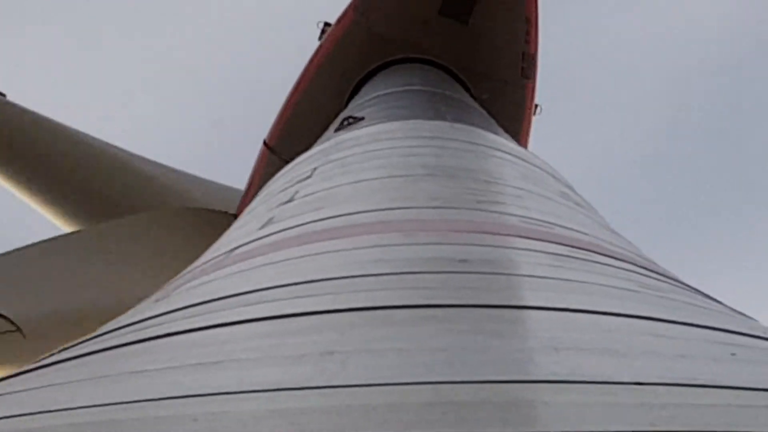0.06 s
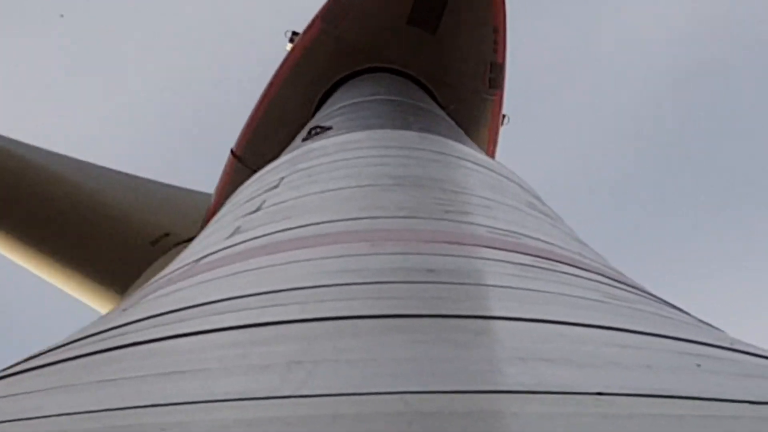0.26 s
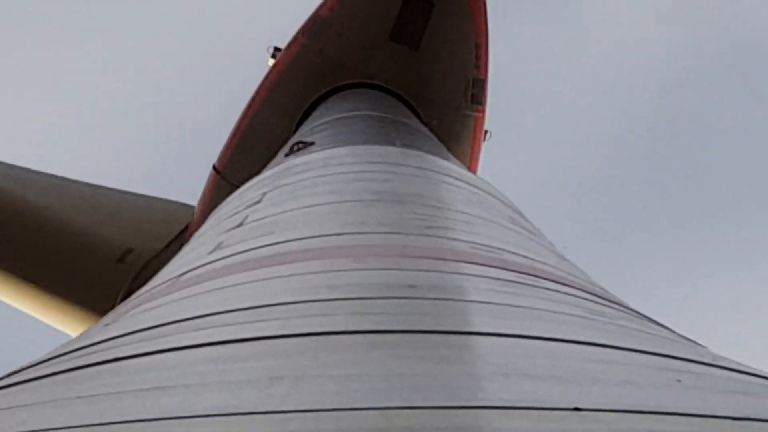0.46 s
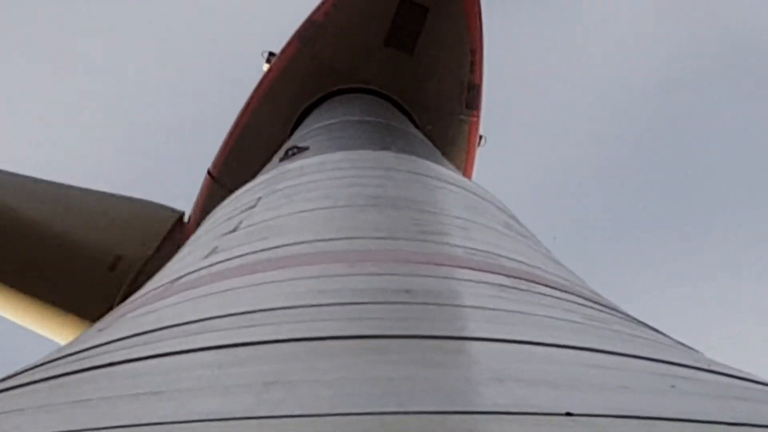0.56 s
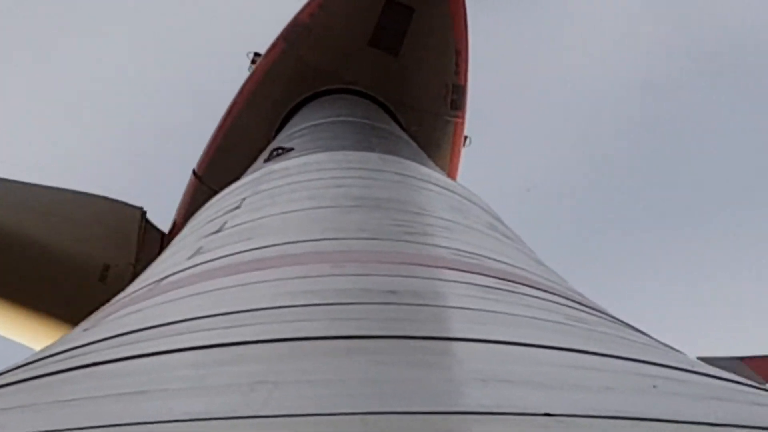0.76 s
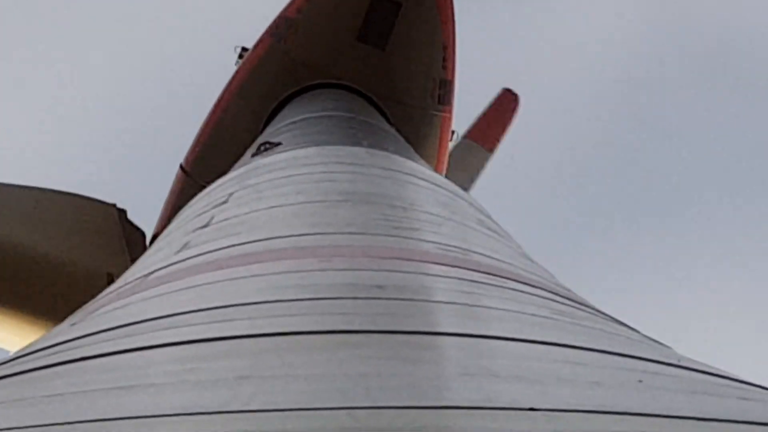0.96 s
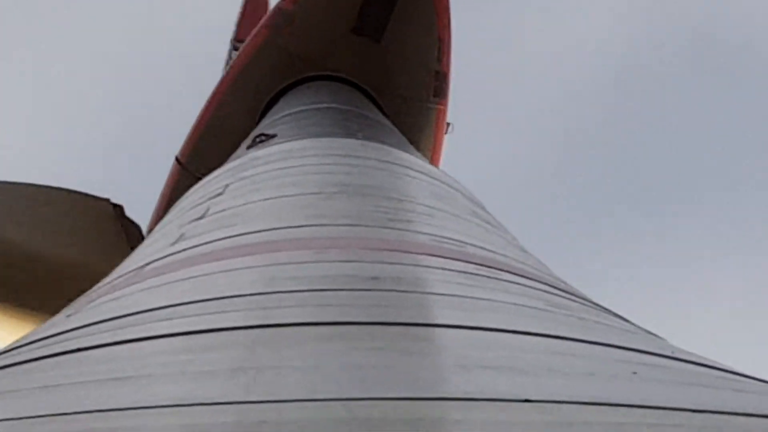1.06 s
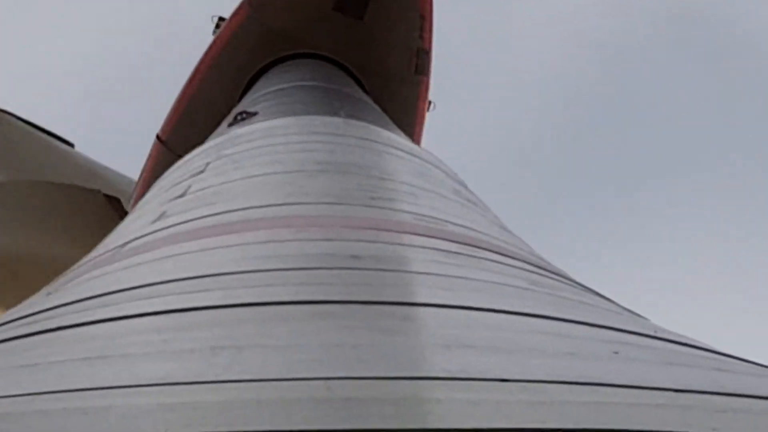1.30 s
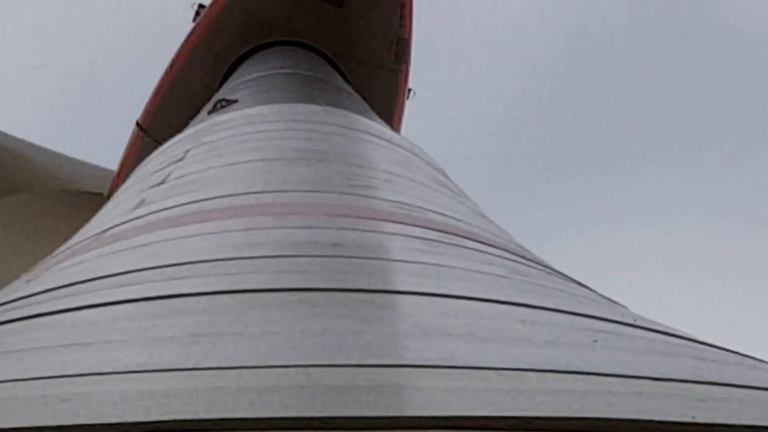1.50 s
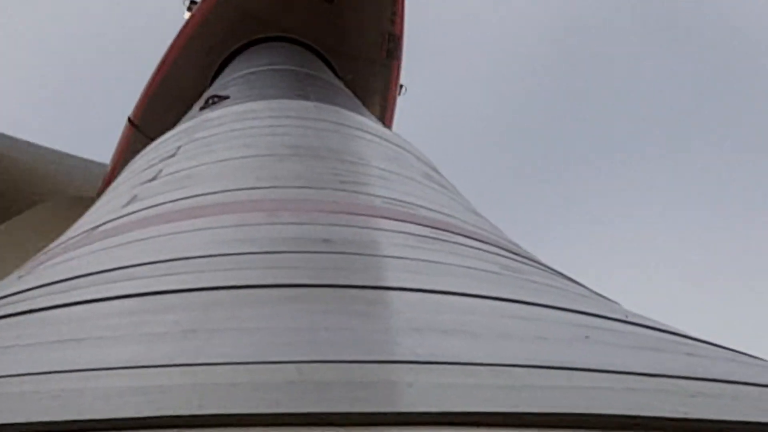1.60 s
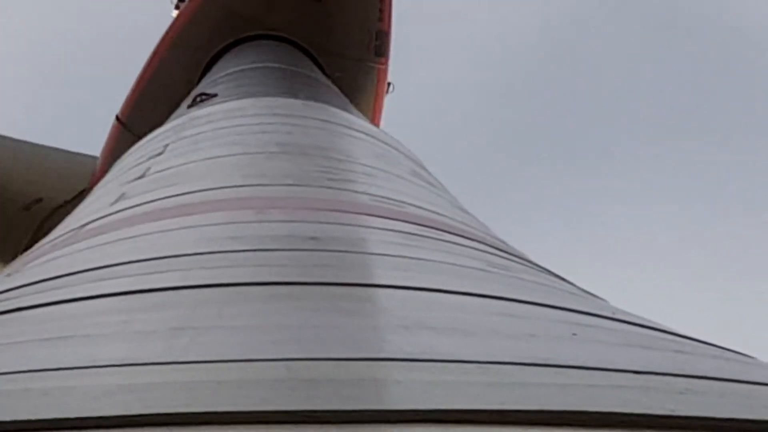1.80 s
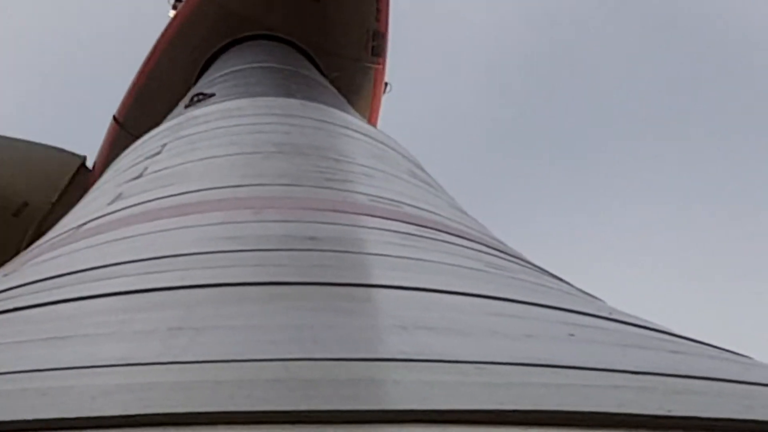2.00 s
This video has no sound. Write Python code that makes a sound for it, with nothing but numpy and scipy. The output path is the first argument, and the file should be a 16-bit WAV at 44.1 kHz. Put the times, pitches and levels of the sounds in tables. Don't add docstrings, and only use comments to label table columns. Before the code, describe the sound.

Wind buffeting thumps a handheld microphone beneath a turbine, then drops to quiet blade swishes

```python
import sys
import numpy as np
from scipy import signal
from scipy.io import wavfile

SR = 44100
rng = np.random.default_rng(int(sys.argv[2]) if len(sys.argv) > 2 else 0)


def volts_from_decibels(level):
    exponent = np.asarray(level, float) / 20
    return 10 ** exponent


def put_to_file(sound):
    columns = np.atleast_2d(sound).T
    safe = np.clip(columns, -1, 1)
    whole_steps = np.round(safe * 32767)
    wavfile.write(sys.argv[1], SR, whole_steps.astype(np.int16))


N = 90404

# (time [s], level [dB])
BLADE_PASSES = [(0.0, -44), (0.18, -44), (0.34, -39), (0.51, -38.5), (0.71, -44.5), (0.97, -47),
                (1.6, -49.5), (1.76, -43), (1.89, -44.5), (1.92, -46), (1.97, -45.5), (2.05, -46)]
# (frequency [Hz], density [dB per Hz])
SWISH_SPECTRUM = [(200, -8), (500, -1.5), (1000, 0.5), (2000, -3), (4000, -5.5), (6500, -10), (10000, -26),
                  (15500, -44)]
# (time [s], pitch [Hz], level [dB])
TIP_WHISTLE = [(0, 8360, -76), (.08, 8250, -68), (.15, 8030, -57.5), (.22, 7600, -64), (.3, 7250, -68),
               (.4, 7000, -90), (2.05, 7000, -99)]
# (time [s], pitch [Hz], level [dB])
TRAILING_EDGE = [(0, 3300, -90), (1.64, 3350, -76), (1.71, 3250, -53), (1.756, 2900, -49),
                 (1.785, 2850, -52), (1.805, 2820, -46), (1.84, 3000, -49), (1.89, 3150, -45),
                 (1.92, 3000, -57), (1.96, 3250, -48), (2.0, 3100, -51.5), (2.05, 3000, -64)]
# (middle [s], half length [s], pitch [Hz], width [Hz], level [dB])
BLADE_EDGE_TONES = [(1.815, .035, 1620, 280, -45), (0.54, 0.035, 8200, 800, -61),
                    (0.81, .04, 9500, 900, -67), (1.11, 0.067, 9900, 760, -78),
                    (1.8, 0.061, 730, 380, -43.5), (.36, 0.066, 3800, 620, -53.5),
                    (0.37, 0.18, 6700, 470, -59), (1.82, 0.1, 4400, 540, -53.5),
                    (1.72, 0.065, 11200, 800, -69), (1.95, 0.11, 11000, 2100, -65),
                    (.59, .075, 12200, 2000, -65), (.515, .012, 9500, 5000, -63),
                    (1.86, .04, 5800, 900, -58), (.17, 0.064, 1000, 200, -47), (1.79, .03, 4700, 500, -52),
                    (.45, 0.19, 5700, 280, -59), (0.52, 0.044, 8400, 500, -60),
                    (1.82, .05, 9800, 900, -63.5), (1.69, .03, 6000, 700, -60),
                    (1.98, .035, 4300, 430, -54), (1.42, 0.018, 3000, 300, -56.5),
                    (.2, 0.037, 9100, 500, -72)]
EDGE_TONE_FALL = 0.3

# (frequency [Hz], density [dB per Hz])
DRONE_SPECTRUM = [(30, -31), (70, -15), (115, -5.5), (185, -9), (310, -1), (500, -6), (620, -12),
                  (1500, -33)]
DRONE_DB, DRONE_FOLLOWS_BLADE = -37.5, 0.1
# (middle [s], half length [s], pitch [Hz], width [Hz], level [dB])
GEAR_TONES = [
    (1.91, 0.117, 506, 8.8, -45),
    (2.5, 0.048, 350, 15, -44),
    (1.03, 0.031, 430, 19, -45),
    (1.14, 0.033, 380, 20, -42),
    (0.76, .07, 505, 15, -44.5),
    (1.2, 0.0496, 220, 25, -45),
    (1.65, 0.06, 285, 18, -44.5),
    (.07, 0.031, 278, 40, -39.5),
]

# (time [s], level [dB])
GUST = [(0, -35.5), (.2, -35), (.33, -28), (.45, -27.5), (.6, -26), (.75, -25.5), (.9, -29), (.99, -33),
        (1.15, -49.5), (2.05, -69)]
# (time [s], peak [dB], size as frequency [Hz], wake [ratio])
STRONG_EDDIES = [(0.016, -28, 85, 0.87), (0.074, -30.5, 80, .5), (0.138, -22, 280, .5),
                 (.170, -25, 420, -0.77), (0.205, -24, 150, 0.42), (0.2129, -23, 110, 0.13),
                 (0.2238, -22, 197, 0.9), (.238, -23.5, 150, 1), (.246, -22, 109, -.4),
                 (0.2898, -18.5, 110, -.3), (0.305, -16, 98, 1.7), (.345, -26, 130, .5),
                 (.354, -24.5, 130, 0.85), (.375, -19, 89.5, -.8), (0.393, -18.5, 110, .8),
                 (0.4206, -6, 150, -0.11), (.426, -3.5, 188, -0.6), (0.4325, -8.5, 164, -1.1),
                 (0.4366, -4.5, 170, 1.45), (0.4506, -9.5, 155, -0.52), (0.4579, -17, 170, 0.71),
                 (.469, -14.5, 110, 1.5), (0.477, -19, 100, -.3), (0.531, -18, 109.8, .2),
                 (0.544, -10, 142, 0.65), (0.5504, -13.5, 169, 0.022), (0.564, -14.5, 160, .7),
                 (0.5718, -16, 139, -0.27), (.587, -17, 150, 1), (0.6002, -14.5, 166, -0.59),
                 (0.6072, -17, 170, 0.31), (.626, -12, 129, 1.2), (0.6358, -9.5, 166, 0.79),
                 (.640, -15, 220, 0.42), (.645, -16, 180, -1), (0.6567, -18, 158, 1.3),
                 (.672, -18.5, 128, 0.21), (0.681, -15, 129, -0.59), (.703, -24.5, 109.6, 1.3),
                 (.748, -21, 101.3, 0.34), (0.7869, -12.5, 142, 1.4), (0.8048, -12, 144, 1.5),
                 (0.823, -16.5, 170, -0.11), (.835, -18, 111, -0.34), (.856, -21.5, 100, -0.42),
                 (0.8869, -20.5, 247, 0.33), (.894, -21.5, 150, -.5), (0.904, -23, 220, -.3),
                 (.963, -13.5, 133, 0.2), (.971, -20.5, 119, -.3)]
SMALL_EDDIES_PER_S, EDDY_SPREAD_DB, EDDY_HZ_RANGE = 260, 1.5, (62.7, 310)
EDDY_CORE_DB, EDDY_CORE_RATIO, SMALL_EDDY_WAKE = -15, 3.16, 0.58
WIND_PAN_DB = 0.63
# (time [s], pitch [Hz], level [dB])
HOUSING_WHISTLE_HIGH = [(0, 1430, -58), (.2, 1442, -54), (.26, 1480, -42), (.35, 1514, -43),
                        (.45, 1572, -44), (.55, 1590, -43.5), (.62, 1558, -46.5), (.72, 1500, -56),
                        (.95, 1450, -64), (2.05, 1450, -88)]
# (time [s], pitch [Hz], level [dB])
HOUSING_WHISTLE_LOW = [(0, 1402, -59), (.22, 1400, -57), (.27, 1342, -41.5), (.39, 1396, -41),
                       (.47, 1429, -44), (.55, 1377, -48), (.65, 1396, -49), (.75, 1380, -53.5),
                       (.95, 1380, -62), (2.05, 1383, -88)]
HOUSING_WHISTLE_WIDTH_HZ = 118
# (time [s], pitch [Hz], level [dB])
PORT_EDGE_HISS = [(0, 11000, -100), (.42, 11500, -78), (.52, 12500, -71), (.6, 13600, -71),
                  (.7, 13800, -72), (.82, 13900, -73), (.89, 13530, -84), (2.05, 13600, -99)]
# (time [s], level [dB], low body mode [dB], crack [dB])
STRAP_TICKS = [(.037, -28, -27, -6), (.1125, -32, -6, -8), (0.1527, -20.5, -27, -8), (.15525, -25, -12, -8),
               (.168, -24, -8, -6), (0.1942, -23, -17, -6), (.211, -27, -13, -12), (.2250, -21, -1.5, -2),
               (0.2349, -28.5, 2.5, -2), (.388, -26, -15, -3), (0.4877, -28, 7.5, 8),
               (1.475, -39, 10.5, 12)]
# (frequency [Hz], level [dB], 60 dB decay [s])
HOUSING_MODES = [
    (677, 3, 0.016),
    (1450, -4.5, 0.035),
    (2620, -22, 0.013),
    (2020, -3, 0.003),
]
CONTACT_HZ = 5000

# (frequency [Hz], density [dB per Hz])
FIELD_SPECTRUM = [(400, -11), (1000, 1), (2000, -2.5), (4000, -8), (7000, -18), (10000, -19), (12000, -31),
                  (15500, -36)]
FIELD_DB = -48.5
WHINE_HZ, WHINE_DB, WHINE_FADE_DB_PER_S = 3999.5, -67, 7
# (frequency [Hz], side against mid [dB])
SIDE_LEVEL = [(100, -46), (400, -31.5), (1200, -23.5), (2300, -26), (3500, -23.5), (4200, -14.5),
              (6000, -25.5), (15000, -20)]
# (frequency [Hz], width [Hz], boost [dB])
PORT_RESONANCES = [(2820, 510, 3.5), (4220, 550, 5.5), (5690, 600, 6), (9400, 880, 4), (5030, 510, -3.5),
                   (11400, 740, 2), (12400, 1600, -4.5)]


def rms_one(x):
    return x / np.sqrt(np.mean(x ** 2) + 1e-20)


def in_time(rows):
    s, *columns = np.transpose(rows)
    return [np.interp(np.arange(N) / SR, s, c) for c in columns]


def drift(rate):
    r = np.exp(-80 * np.pi * rate / SR)
    white = rng.standard_normal(N // 40 + 2002)
    slow = signal.lfilter([1], [1, -2 * r, r * r], white)[2000:]
    return np.interp(np.arange(N) / 40, np.arange(len(slow)), rms_one(slow))


def banded_noise(spectrum, patchy_db):
    hz_points, db_points = np.transpose(spectrum)
    side_hz, side_points = np.transpose(SIDE_LEVEL)
    edges = 25 * 2 ** np.arange(0, 9.5, 1 / 3)
    together = drift(7)
    white = rng.standard_normal((2, 2, N))
    out = 0
    for k, (low, high) in enumerate(zip(edges, edges[1:])):
        if low > hz_points[-1] or high < hz_points[0]:
            continue
        band = signal.butter(2, [low, high], "band", fs=SR, output="sos")
        mid, side = signal.sosfilt(band, white[k % 2])
        log_hz = np.log(low * high) / 2
        db = np.interp(log_hz, np.log(hz_points), db_points)
        side_db = np.interp(log_hz, np.log(side_hz), side_points)
        flicker_db = patchy_db * (0.19 * together + drift(9.3))
        out = out + volts_from_decibels(db + flicker_db) * (mid + volts_from_decibels(side_db) * side * [[1], [-1]])
    return rms_one(out)


def narrow_noise(phase, width_hz):
    low_pass = signal.butter(2, width_hz / 2, fs=SR, output="sos")
    a, b = signal.sosfilt(low_pass, rng.standard_normal((2, N)))
    return rms_one(a * np.cos(phase) + b * np.sin(phase))


def whistle(rows, width_hz, lumpy_db):
    hz, db = in_time(rows)
    phase = 2 * np.pi * np.cumsum(hz) / SR
    return volts_from_decibels(db + lumpy_db * drift(15.6)) * narrow_noise(phase, width_hz)


def swells(rows, fall_per_s):
    out = np.zeros(N)
    for s, half_s, hz, width_hz, db in rows:
        t = np.arange(N) / SR - s
        phase = 2 * np.pi * hz * (t - fall_per_s * t * t / 2)
        out += volts_from_decibels(db) * narrow_noise(phase, width_hz) * np.exp(-(t / half_s) ** 4)
    return out


def blades(blade_db):
    power = volts_from_decibels(2 * blade_db) - volts_from_decibels(2 * (FIELD_DB + 0.5))
    level = np.sqrt(np.maximum(power, 0)) * volts_from_decibels(1.0)
    swish = level * banded_noise(SWISH_SPECTRUM, patchy_db=2.15)
    tip = whistle(TIP_WHISTLE, width_hz=170, lumpy_db=-2.0)
    trailing_edge = whistle(TRAILING_EDGE, width_hz=430, lumpy_db=0.0)
    return swish + tip + trailing_edge + swells(BLADE_EDGE_TONES, EDGE_TONE_FALL)


def nacelle(blade_db):
    level = volts_from_decibels(DRONE_DB + DRONE_FOLLOWS_BLADE * (blade_db + 44.0))
    return level * banded_noise(DRONE_SPECTRUM, patchy_db=2.5) + swells(GEAR_TONES, 0)


def eddy(hz, wake):
    u = np.pi * hz * np.arange(-1200, 1201) / SR
    core = np.cos(2 * EDDY_CORE_RATIO * u + 0.63) * np.exp(-1.3 * u * u)
    return (1 - wake * u - 2 * u * u) * np.exp(-u * u) + volts_from_decibels(EDDY_CORE_DB) * core


def buffeting():
    gust = volts_from_decibels(in_time(GUST)[0])
    strength = volts_from_decibels(EDDY_SPREAD_DB * np.minimum(rng.exponential(1, N), 2.5))
    born = (rng.random(N) < SMALL_EDDIES_PER_S / SR) * strength * rng.choice([-1, 1], N)
    size = rng.integers(0, 8, N)
    small = np.zeros(N)
    for k, hz in enumerate(np.geomspace(*EDDY_HZ_RANGE, num=8)):
        shape = eddy(hz, SMALL_EDDY_WAKE) * (hz / 100) ** -.6
        small += signal.fftconvolve(born * (size == k), shape, "same")
    small = rms_one(small)
    out = np.pad(small * gust, 1200)
    for s, db, hz, wake in STRONG_EDDIES:
        start = int(s * SR)
        out[start:start + 2401] += volts_from_decibels(db) * eddy(hz, wake)
    out = signal.sosfilt(signal.butter(1, 45, "high", fs=SR, output="sos"), out[1200:-1200])
    lean = np.clip(np.arange(N) / SR / 0.39, 0, 1) * [[1], [-1]]
    difference = volts_from_decibels(-30) * small[::-1] * gust * [[1], [-1]]
    return out * volts_from_decibels(WIND_PAN_DB * lean) + difference


def wind_whistle():
    high = whistle(HOUSING_WHISTLE_HIGH, HOUSING_WHISTLE_WIDTH_HZ, lumpy_db=0.0)
    low = whistle(HOUSING_WHISTLE_LOW, HOUSING_WHISTLE_WIDTH_HZ, lumpy_db=0.5)
    return high + low + whistle(PORT_EDGE_HISS, width_hz=900, lumpy_db=.8)


def strap_ticks():
    s, db, low_db, crack_db = np.transpose(STRAP_TICKS)
    last = len(HOUSING_MODES) - 1
    out = np.zeros(N)
    for k, (hz, mode_db, t60) in enumerate(HOUSING_MODES):
        taps = np.full(N, 1e-18)
        taps[(s * SR).astype(int)] = volts_from_decibels(db + mode_db + low_db * (k == 0) + crack_db * (k == last))
        r, w = volts_from_decibels(-60 / (t60 * SR)), 2 * np.pi * hz / SR
        out += signal.lfilter([0, np.sin(w)], [1, -2 * r * np.cos(w), r * r], taps)
    return signal.sosfilt(signal.butter(2, CONTACT_HZ, fs=SR, output="sos"), out)


def field_hiss():
    return volts_from_decibels(FIELD_DB) * banded_noise(FIELD_SPECTRUM, patchy_db=1.46)


def electronics_whine():
    t = np.arange(N) / SR
    out = np.zeros(N)
    for harmonic, db in zip((1, 2, 3), (1.5, 0, -22)):
        level = volts_from_decibels(WHINE_DB + db - WHINE_FADE_DB_PER_S * t + 4.3 * drift(3.6))
        out += level * np.sin(2 * np.pi * harmonic * WHINE_HZ * t)
    return out


def scene():
    blade_db, = in_time(BLADE_PASSES)
    turbine = blades(blade_db) + nacelle(blade_db)
    wind = buffeting() + wind_whistle() + strap_ticks()
    return turbine + wind + field_hiss() + electronics_whine()


def resonance(hz, width_hz):
    r = np.exp(-np.pi * width_hz / SR)
    return (1 - r * r) / 2 * np.array([1, 0, -1]), [1, -2 * r * np.cos(2 * np.pi * hz / SR), r * r]


def top_cut(x):
    return signal.sosfilt(signal.butter(12, 15770, fs=SR, output="sos"), x)


def record(dry):
    mix = dry
    for hz, width_hz, db in PORT_RESONANCES:
        mix = mix + (volts_from_decibels(db) - 1) * signal.lfilter(*resonance(hz, width_hz), mix)
    return top_cut(mix)


dry = scene()
out = record(dry)
put_to_file(out)
```